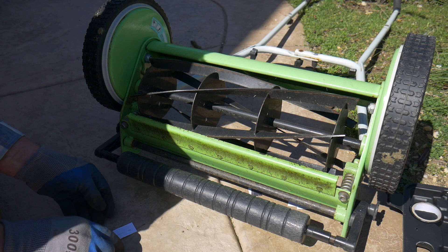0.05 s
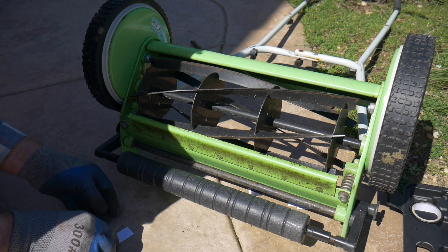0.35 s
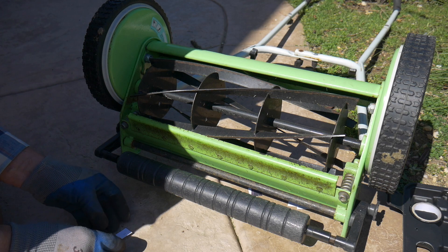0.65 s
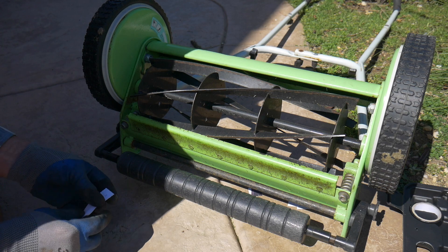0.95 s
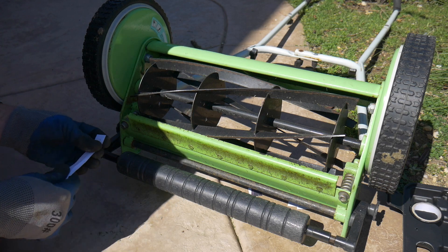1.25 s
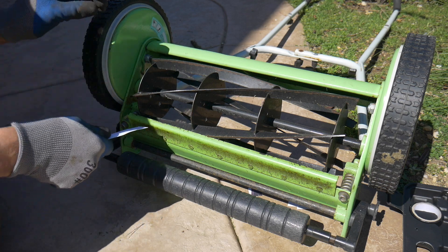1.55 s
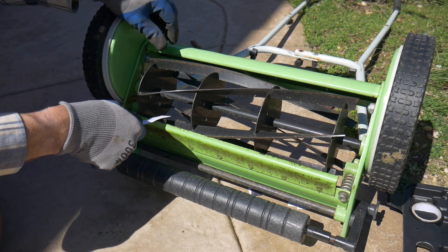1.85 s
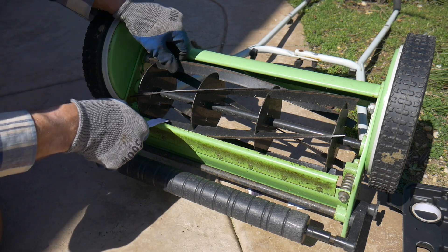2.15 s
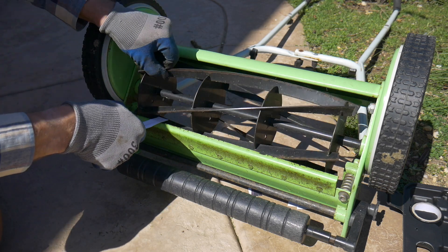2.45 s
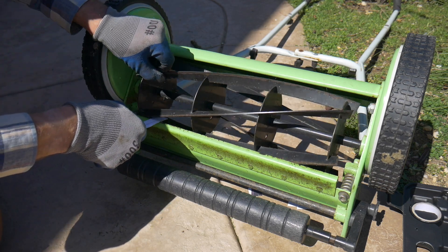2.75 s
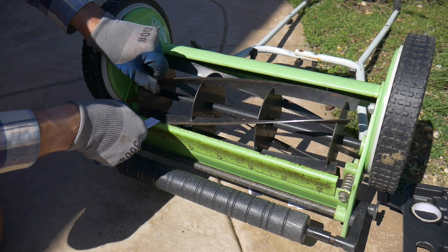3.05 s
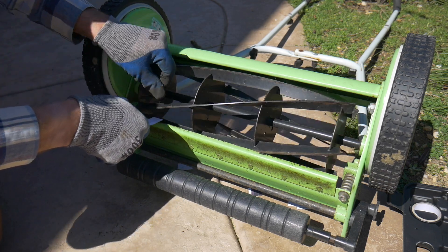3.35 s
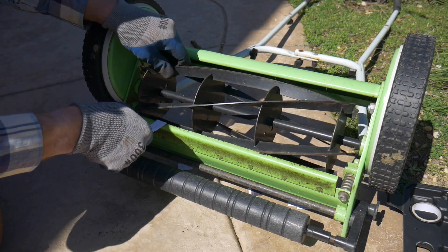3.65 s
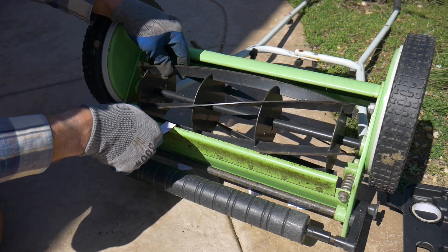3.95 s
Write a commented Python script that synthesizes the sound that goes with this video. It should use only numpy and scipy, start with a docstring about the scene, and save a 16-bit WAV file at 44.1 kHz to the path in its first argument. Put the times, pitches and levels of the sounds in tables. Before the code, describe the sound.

A hand mower's steel blades, turned slowly close to the microphone, scrape and squeal three times, the last loudest and ringing on. Before that, a distant bird chirps and paper rustles faintly over low outdoor rumble.

```python
"""A concrete drive, the microphone close to a hand mower whose reel is turned slowly. Three blades in turn
drag across the bed knife: steel grinds, sticks and squeals at jumping pitches, and the reel rings on.
Before that a paper strip rustles between gloved fingers. A bird sings some way off, over low outdoor
rumble. The loudest squeals push the recorder into its limiter."""
import sys
import numpy as np
from scipy import signal
from scipy.fft import rfft, irfft
from scipy.io import wavfile
from scipy.ndimage import uniform_filter1d, minimum_filter1d

SR = 44100
rng = np.random.default_rng(int(sys.argv[2]) if len(sys.argv) > 2 else 0)


def wav_record(signal):
    """Record a signal, one row per channel, as 16-bit PCM in the file named by sys.argv[1]."""
    frames = np.transpose(np.atleast_2d(signal))
    bounded = np.clip(frames, -1, 1)
    # unit amplitude maps onto the largest positive 16-bit level
    quanta = np.round(bounded * 32767).astype(np.int16)
    wavfile.write(sys.argv[1], SR, quanta)


N = 176400
T = np.arange(N) / SR
YARD_T60_S, SQUEAL_ATTACK_S = 0.38, 0.013
SIDE_DB = -18.5  # stereo width of the air and the frame's rumble
# the reel's modes, before each blade scales them: f/Hz, level/dB, t60/s
REEL_MODES = [(1124, -44, 0.5), (1785.6, -30, 0.49), (2295.4, -21.5, 1.19), (2334, -26, 0.99),
              (3417, -41, 0.249), (4500, -31, 0.52), (4610, -29, 0.68), (6780, -36.5, 0.15),
              (6995, -39, 0.28), (9130, -39.5, 0.14), (13100, -47.5, 0.084)]


def from_db(db):
    """Decibels to gain."""
    return 10 ** (np.asarray(db) / 20)


def rms_one(x):
    """Scale to unit power."""
    return x / np.sqrt(np.mean(x ** 2) + 1e-20)


def drift(hz):
    """Random wander of unit power, mostly slower than hz."""
    return rms_one(signal.sosfilt(signal.butter(2, hz, fs=SR, output="sos"), rng.standard_normal(N)))


def coloured(x, points):
    """Give a steady texture a spectrum; unit power."""
    hz, db = np.transpose(points)
    bins = np.maximum(np.arange(N // 2 + 1) * SR / N, 1)
    gain = from_db(np.interp(np.log(bins), np.log(hz), db))
    return rms_one(irfft(rfft(x) * gain, N))


def dying(seconds, t60):
    """Exponential decay, 1 before time zero."""
    return np.exp(-np.log(1000) * np.minimum(np.maximum(seconds, 0) / t60, 10))


def held(start, length, attack, t60):
    """Rise, hold, die away."""
    rise = np.sin(np.pi / 2 * np.clip((T - start) / attack, 0, 1)) ** 2
    return rise * dying(T - start - length, t60)


def arch(start, length):
    """A rounded swell from nothing to 1 and back."""
    return np.sqrt(np.abs(np.sin(np.pi * np.clip((T - start) / length, 0, 1))))


def tail(x, t60):
    """Dense dying reflections at unit power gain."""
    t = T[:int(t60 * SR)]
    response = rng.standard_normal(N)[:len(t)] * dying(t, t60)
    return signal.fftconvolve(x, response / np.sqrt(np.sum(response ** 2)))[:N]


def dull(x, cutoff_hz=6600):
    """Reflections lose their treble."""
    return signal.sosfilt(signal.butter(2, cutoff_hz, fs=SR, output="sos"), x)


def grains(per_s=12000, spread_db=2.5):
    """Dense tiny slips of uneven size."""
    sizes = from_db(spread_db * np.minimum(rng.exponential(1, N), 4)) * rng.choice([-1, 1], N)
    return sizes * (rng.random(N) < per_s / SR)


def background(hum_hz=245, hum_end_s=0.402, whine_hz=803):
    """Low outdoor rumble, a far hum that stops, and a thin electrical whine."""
    # spectrum of the open air: f/Hz, relative level/dB
    air = [(15, -34.5), (25, -4), (99, 1), (497, -22.5), (806, -30.5), (1270, -32.5), (1580, -24),
           (4770, -38.5), (15600, -43)]
    mid, side = (from_db(-67.5) * coloured(rng.standard_normal(N), air) for _ in range(2))
    hum = from_db(-62.5) * np.sin(2 * np.pi * hum_hz * T) * dying(T - hum_end_s, t60=0.17)
    whine = sum(from_db(-89.5 - np.log2(k)) * np.sin(2 * np.pi * k * whine_hz * T) for k in range(1, 11))
    return mid + hum + whine + from_db(SIDE_DB) * side * [[1], [-1]]


def bird():
    """Some way off, short warbled glides, blurred by the yard."""
    # song notes: t/s, length/s, first f/Hz, last f/Hz, level/dB
    notes = [(0.089, 0.063, 2746, 1960, -55.5), (0.285, 0.091, 2670, 2493, -53),
             (0.453, 0.052, 2260, 1924, -64.5), (0.489, 0.055, 2715, 2748, -45.5),
             (0.634, 0.019, 2460, 2050, -55), (0.662, 0.049, 2885, 2627, -46),
             (0.816, 0.021, 2455, 2150, -59.5), (0.839, 0.051, 2643, 2550, -47),
             (1.047, 0.051, 2467, 2550, -51.5), (1.288, 0.042, 2120, 2255, -55),
             (1.338, 0.0098, 3220, 2480, -55), (1.341, 0.09, 2187, 2113, -53),
             (1.589, 0.04, 2727, 2605, -57.5), (1.686, 0.017, 3040, 2590, -58.5),
             (1.943, 0.039, 2547, 2468, -55.5), (2.033, 0.016, 2960, 2250, -55),
             (2.059, 0.068, 2272, 2106, -64), (3.87, 0.021, 2750, 2526, -51)]
    song = np.zeros(N)
    warble = 1 + 0.042 * drift(hz=141)
    for start, length, first_hz, last_hz, db in notes:
        hz = np.interp(T, [start, start + length], [first_hz, last_hz]) * warble
        song += from_db(db) * arch(start, length) * np.sin(2 * np.pi * np.cumsum(hz) / SR)
    return song + from_db(-5) * tail(song, YARD_T60_S)


def paper():
    """At the mower, a paper strip slides between gloved fingers."""
    # strokes of paper and glove: t/s, length/s, level/dB
    rustles = [(0.5, 0.065, -67.5), (0.577, 0.053, -62), (0.629, 0.096, -65.5), (0.729, 0.11, -69),
               (0.881, 0.061, -64), (1.3, 0.14, -77), (2.282, 0.067, -70.5)]
    # spectrum of the rustle: f/Hz, relative level/dB
    spectrum = [(500, -12.5), (1500, -9), (2800, -0.5), (3700, 6), (4600, 0), (5600, -22), (6700, 0),
                (8500, -28.5), (15000, -27)]
    strokes = sum(from_db(db) * arch(start, length) for start, length, db in rustles)
    return strokes * coloured(grains(), spectrum)


def knocks(q=4.74, attack_s=0.0073):
    """Short rattling contacts, each into one broad resonance."""
    # knocks of frame, pawl and fingers: peak t/s, level/dB, centre f/Hz, t60/s
    contacts = [(0.706, -48.5, 4330, 0.011), (1.331, -68, 1230, 0.22), (1.957, -61.5, 1340, 0.21),
                (2.548, -40.5, 446, 0.11), (3.101, -35, 560, 0.2), (3.105, -35, 1848, 0.14),
                (3.584, -55.5, 1070, 0.31), (3.723, -46.5, 1050, 0.12), (3.72, -55, 3480, 0.07),
                (3.815, -59.5, 1050, 0.085)]
    out = np.zeros(N)
    for at, db, hz, t60 in contacts:
        peak = signal.iirpeak(hz, q, fs=SR)
        body = rms_one(signal.lfilter(*peak, signal.lfilter(*peak, rng.standard_normal(N))))
        out += from_db(db) * body * held(at - attack_s, attack_s, attack_s, t60)
    return out


def ringing(twin_ratio=1.004, rise_s=0.022, knife_hz=757):
    """The reel's modes build up under each blade and ring on, beating, when it leaves the knife."""
    # blades on the knife: touch t/s, release t/s, tuning ratio, gain/dB, t60 ratio, tilt/(dB/octave)
    blades = [(2.41, 2.519, 0.988, -13.5, 0.47, 2), (2.848, 2.881, 0.97, -13.5, 0.63, -11.5),
              (3.2, 3.296, 1.0, 1, 0.63, 1.5)]
    reel = np.zeros(N)
    main_hz = max(REEL_MODES, key=lambda mode: mode[1])[0]
    for touch, release, tuning, ring_db, stretch, tilt_db in blades:
        first = int(touch * SR)
        t = T[first:]
        for hz, db, t60 in REEL_MODES:
            tone = np.sin(2 * np.pi * (hz * tuning * t + rng.random()))
            twin = from_db(-9) * np.sin(2 * np.pi * (hz * tuning * twin_ratio * t + rng.random()))
            level = from_db(db + ring_db + tilt_db * np.log2(hz / main_hz))
            envelope = held(touch, release - touch, rise_s, t60 * stretch)[first:]
            reel[first:] += level * (tone + twin) * envelope
    # the knife rings on after the lowest squeal
    knife = held(start=2.46, length=0, attack=SQUEAL_ATTACK_S, t60=0.23) * np.sin(2 * np.pi * knife_hz * T)
    return reel + from_db(-21) * knife


def steel(x, width_hz=70, ripple_db=5.5, mode_boost_db=9):
    """Sound passes through a thicket of narrow resonances; the reel's own modes stand out."""
    hz = np.arange(N // 2 + 1) * SR / N
    spots = np.arange(0, SR / 2, width_hz)
    ripple = ripple_db * np.interp(hz, spots, np.clip(rng.standard_normal(len(spots)), -2, 2))
    peaks = np.max([1 / (1 + ((hz - mode[0]) / width_hz) ** 2) for mode in REEL_MODES], axis=0)
    return irfft(rfft(x) * from_db(ripple * (1.5 - peaks) + mode_boost_db * peaks), N)


def grinding(squeal, chatter_db=2.5):
    """Tiny slips, bunched by each cycle of the squeal, excite the steel edge; the frame rumbles below."""
    # the edge bites: t/s, length/s, then bass, middle and treble level/dB before each band's trim
    bites = [(2.37, 0.094, -59, -33.5, -42), (2.475, 0.035, -43, -37.5, -53.5),
             (2.806, 0.031, -59.5, -50, -36.5), (2.863, .032, -85, -39.5, -70),
             (3.006, 0.11, -73, -66, -83), (3.075, 0.051, -50.5, -48, -61.5), (3.133, .034, -47, -41, -32),
             (3.167, 0.04, -41.5, -44, -44), (3.216, 0.051, -30, -26.5, -27),
             (3.268, 0.045, -35, -28.5, -25.5)]
    # spectra of the three grinding bands: f/Hz, relative level/dB
    bass_shape = [(25, -2), (60, -9.5), (150, -7), (260, -7), (380, -8.5), (550, -2), (700, -8.5),
                  (1500, -48)]
    middle_shape = [(600, -25.5), (900, -12.5), (1130, 3), (2000, 3.5), (3200, 4), (4600, 1.5), (6000, -4),
                    (8000, -10), (11000, -29.5)]
    treble_shape = [(3000, -23.5), (6000, 1.5), (7200, 5.5), (9300, 5), (10400, -2), (11500, 1), (12600, 2),
                    (13700, -2.5), (15500, -7.5)]
    bass, middle, treble = sum(np.outer(from_db(levels), held(start, length, attack=0.02, t60=0.085))
                               for start, length, *levels in bites)
    bunching = 1 + 0.22 * np.cos(np.angle(signal.hilbert(squeal)))
    chatter = from_db(chatter_db * drift(hz=118))
    scrape = from_db(4) * middle * coloured(steel(grains()), middle_shape)
    hiss = from_db(1.5) * treble * coloured(steel(grains()), treble_shape)
    edge = bunching * chatter * (scrape + hiss)
    frame_mid, frame_side = (coloured(grains(), bass_shape) for _ in range(2))
    rumble = from_db(-1.5) * bass * (frame_mid + from_db(SIDE_DB) * frame_side * [[1], [-1]])
    return edge + from_db(-3.5) * dull(tail(edge, t60=0.18)), rumble


def squeals(t60=0.078, jitter_hz=151, blur_rad=0.55, flutter_db=3.5):
    """The edge sticks and slips, locking on to one resonance after another."""
    # squeals: t/s, length/s, first f/Hz, last f/Hz, level/dB, overtone fall/(dB/octave), roughness 0-1
    slips = [(2.365, 0.09, 730.2, 768.6, -20.5, 9, 0.13), (2.376, 0.038, 2141, 2230, -26.5, 7.5, .45),
             (2.377, .035, 2965, 2966, -26.5, 19, .25), (2.414, 0.045, 2282, 2278, -19, 12.5, 0.25),
             (2.471, 0.027, 2272, 2274, -10, 13, 0.21), (2.8, 0.033, 2235, 2163, -21.5, 27, 0.25),
             (2.809, 0.016, 7326, 7320, -17.5, 15.5, 0.17), (2.829, 0.048, 2272, 2261, -20.5, 17.5, 0.15),
             (2.869, 0.027, 2330, 2420, -24, 13.5, 0.53), (3.071, 0.024, 2380, 2450, -31.5, 22.5, 0.34),
             (3.12, 0.039, 8004, 8220, -21, 27.5, 0.18), (3.161, 0.038, 4865, 4700, -13, 27, 0.34),
             (3.211, 0.081, 2317, 2271, -15.5, 14.5, 0.1), (3.262, 0.023, 4646, 4672, -15, 16, 0.26),
             (3.292, 0.013, 6670, 6740, -6, 20.5, 0.13), (3.302, 0.024, 4580, 4517, -6.5, 21.5, 0.37)]
    out = np.zeros(N)
    scatter = [drift(jitter_hz) for _ in range(9)]  # uneven slips blur the overtones
    for start, length, first_hz, last_hz, db, fall_db, rough in slips:
        part = slice(int(start * SR), int((start + length + t60) * SR))
        t = np.maximum(T[part] - start, 0)
        jitter = 1 + 0.032 * rough * drift(jitter_hz)[part]
        hz = np.interp(t, [0, length], [first_hz, last_hz]) * jitter
        phase = 2 * np.pi * np.cumsum(hz) / SR
        wave = np.zeros(len(t))
        for k in range(1, 9):
            if k * first_hz < SR / 2:
                blur = blur_rad * (k - 1) * rough * scatter[k][part]
                wave += from_db(-fall_db * np.log2(k)) * np.sin(k * phase + blur + rng.uniform(0, 2 * np.pi))
        level = from_db(db + flutter_db * rough * drift(hz=80)[part])
        envelope = np.minimum(t / SQUEAL_ATTACK_S, 1) ** 2 * dying(t - length, t60)
        out[part] += wave * level * envelope
    # one-sided contact mixes the squeals into sum and difference tones
    mixed = signal.sosfilt(signal.butter(2, 1500, "high", fs=SR, output="sos"), out ** 2 + 1e-18)
    return out + 0.97 * mixed


def scene():
    """The mower is close and central, with a faint echo from the yard and the bird beyond."""
    squeal = squeals()
    edge, rumble = grinding(squeal)
    mower = squeal + edge + ringing() + knocks() + paper()
    side = from_db(-37) * tail(mower, t60=0.08)
    echo = from_db(-28.5) * dull(tail(mower, YARD_T60_S))
    return mower + rumble + echo + side * [[1], [-1]] + bird() + background()


def record(dry, limit_db=-7.5, release_db_per_s=300, ceiling=0.33, cutoff_hz=15400):
    """Behind the microphone a fast limiter holds the peaks down, overload rounds them, the top is cut."""
    over_db = np.maximum(20 * np.log10(np.abs(dry).max(axis=0) + 1e-9) - limit_db, 0)
    reduction_db = np.maximum.accumulate(over_db + release_db_per_s * T) - release_db_per_s * T
    limited = dry * from_db(uniform_filter1d(minimum_filter1d(-reduction_db, size=64), size=64))
    rounded = limited / (1 + (limited / ceiling) ** 4) ** 0.25
    return signal.sosfilt(signal.ellip(10, 0.1, 80, cutoff_hz, fs=SR, output="sos"), rounded)


dry = scene()
out = record(dry)
wav_record(out)
```